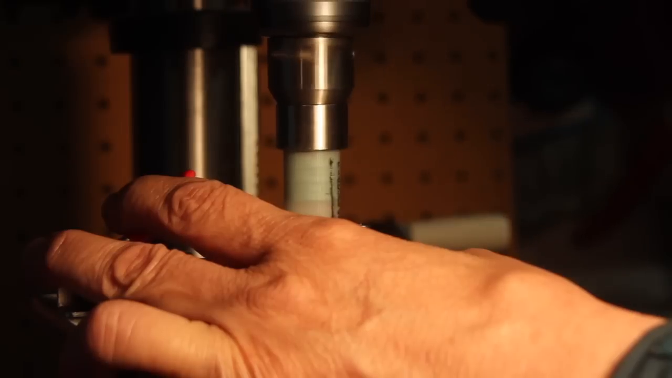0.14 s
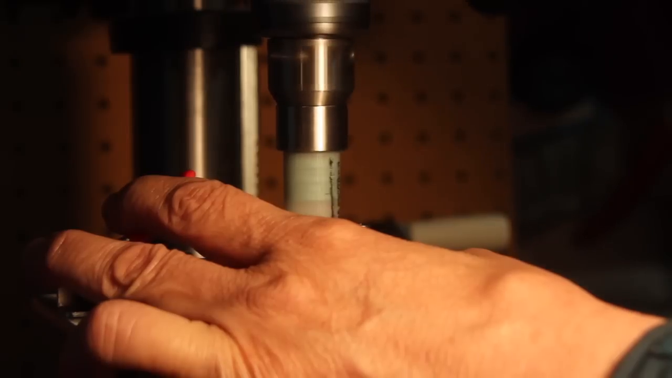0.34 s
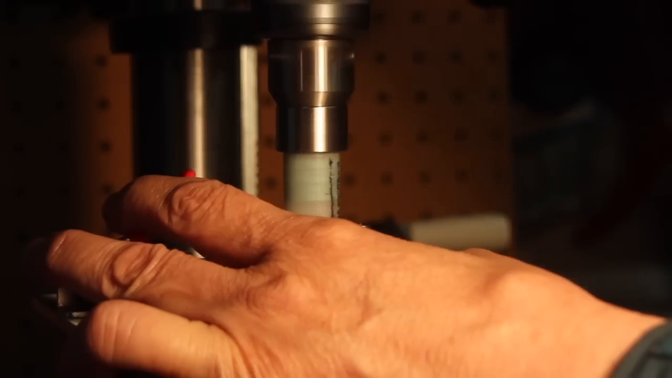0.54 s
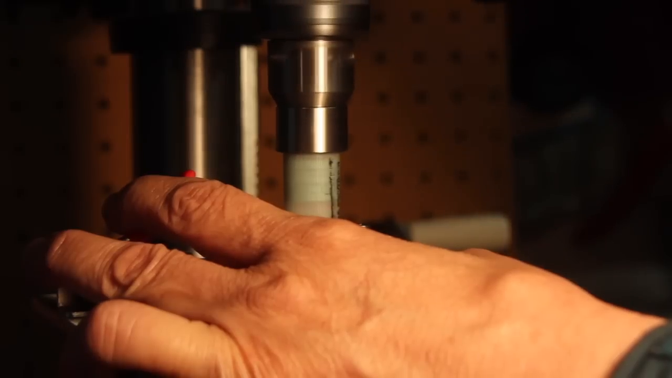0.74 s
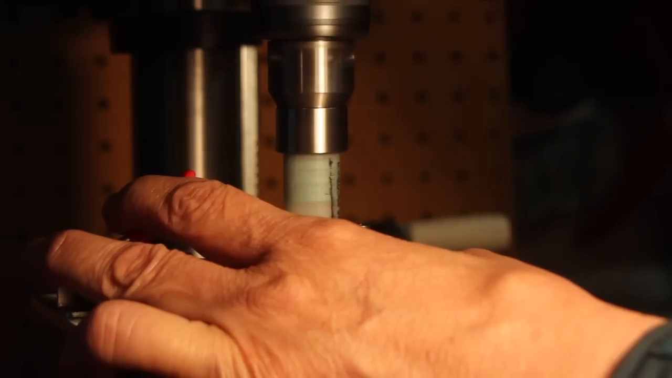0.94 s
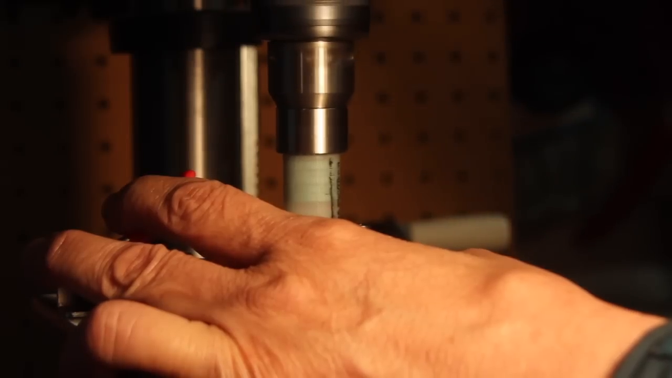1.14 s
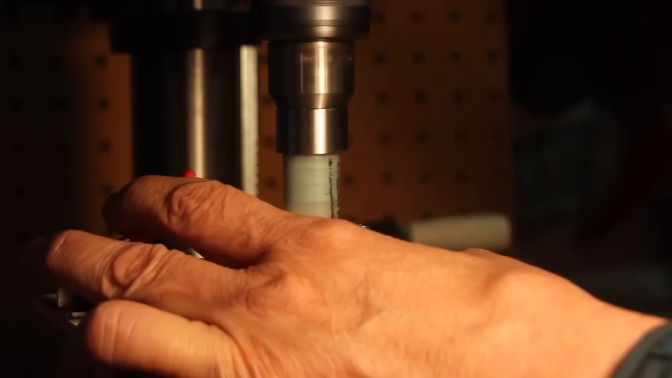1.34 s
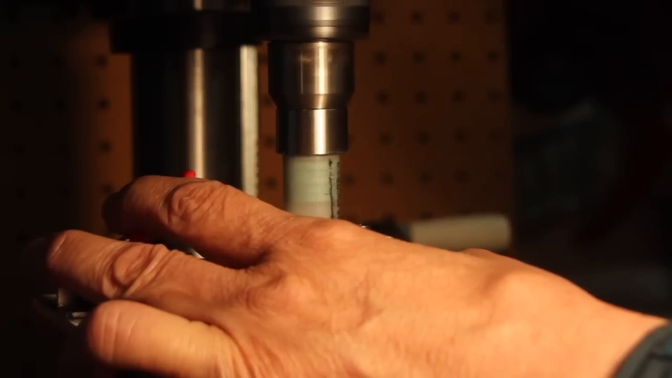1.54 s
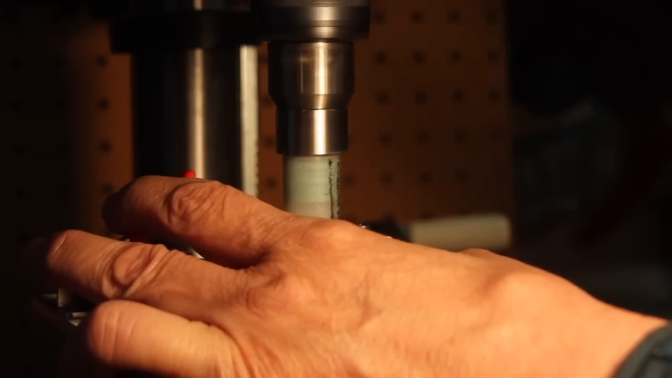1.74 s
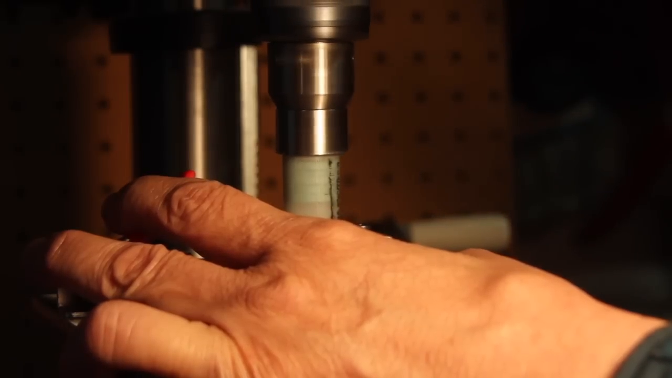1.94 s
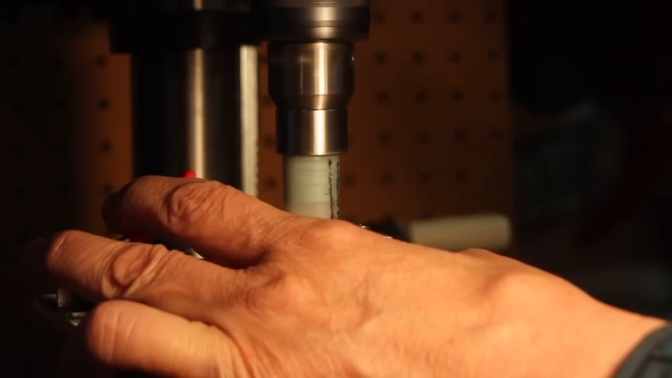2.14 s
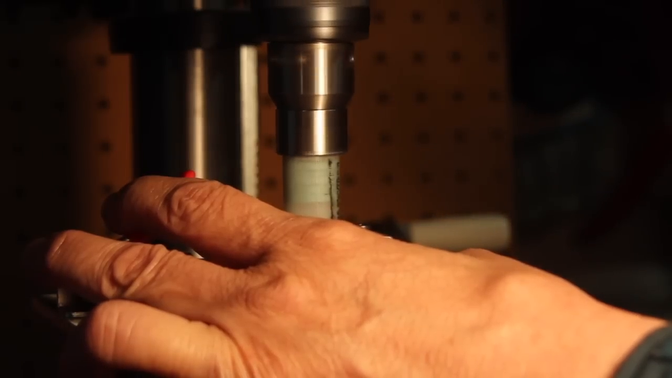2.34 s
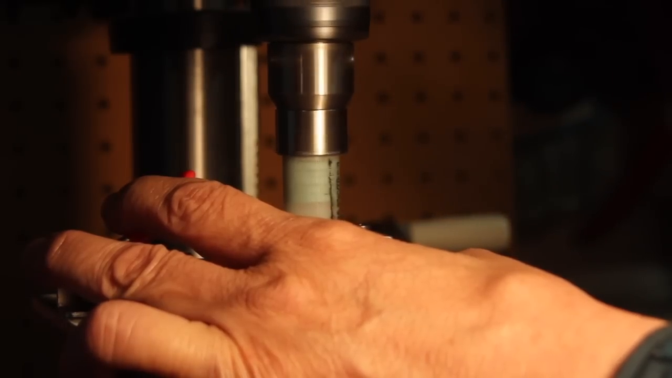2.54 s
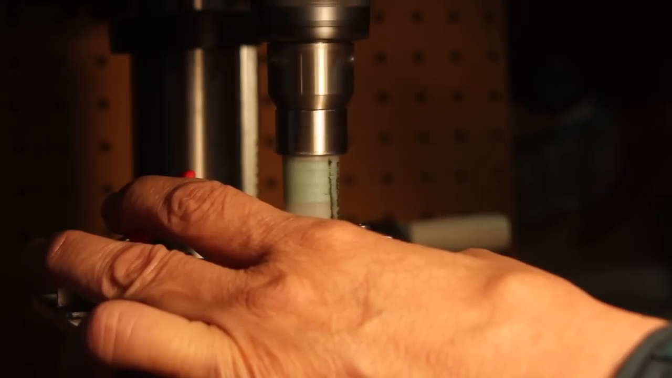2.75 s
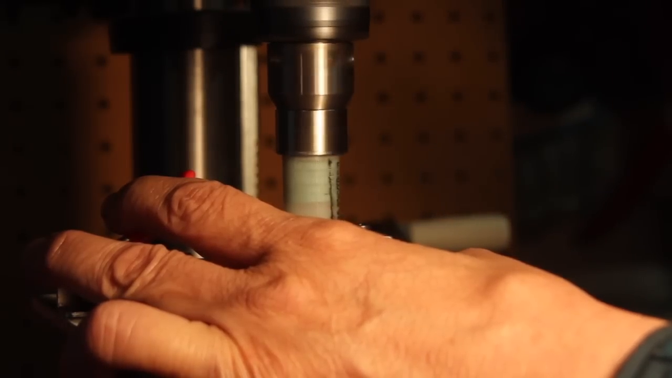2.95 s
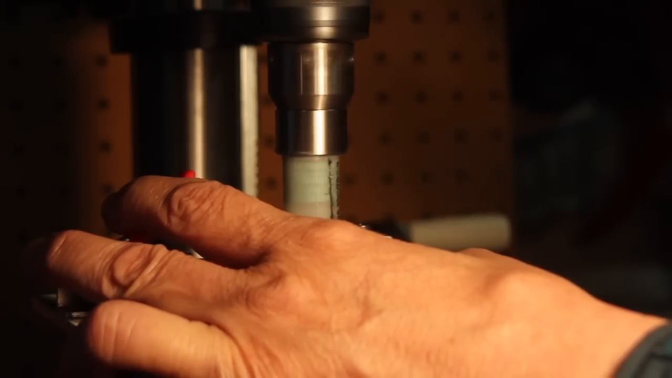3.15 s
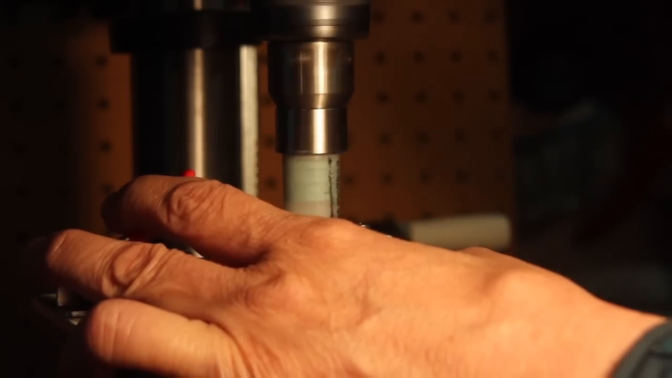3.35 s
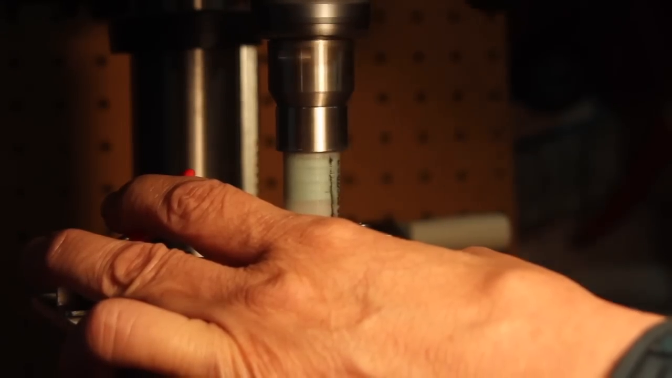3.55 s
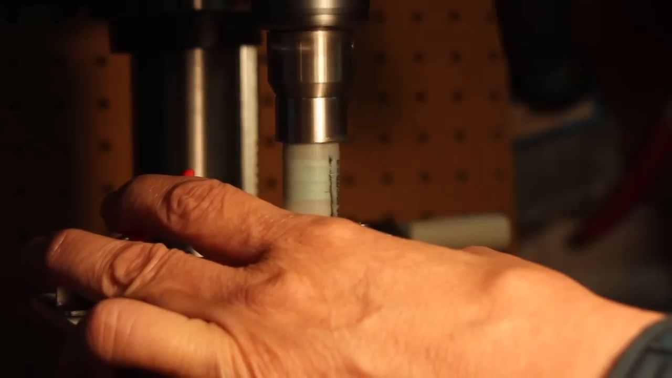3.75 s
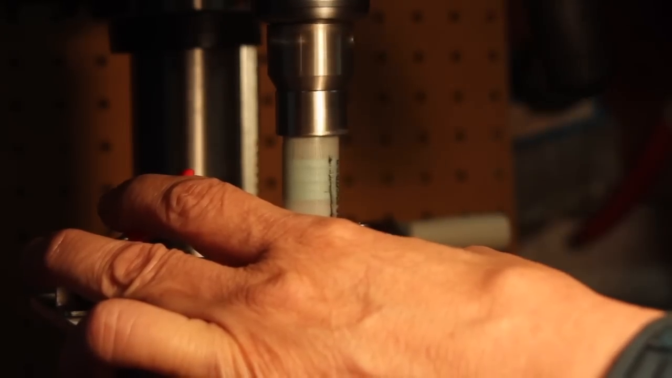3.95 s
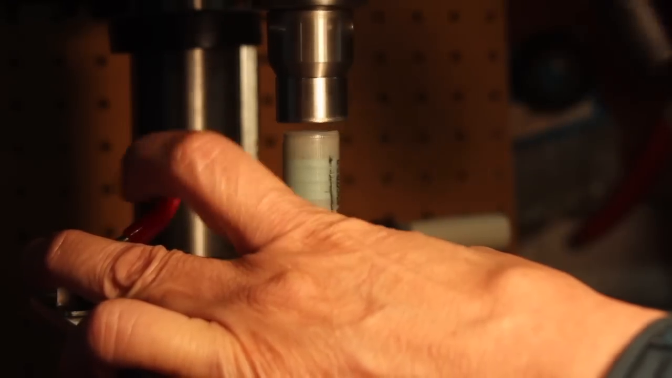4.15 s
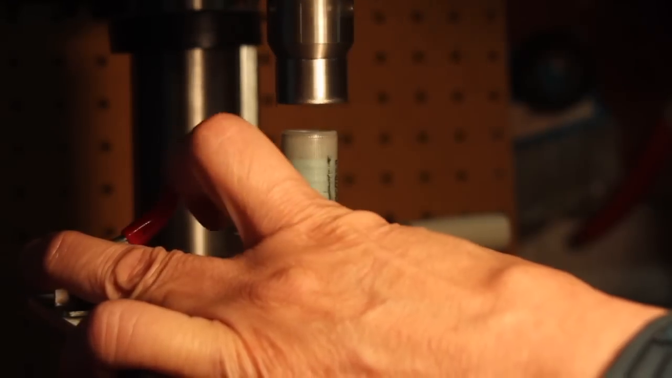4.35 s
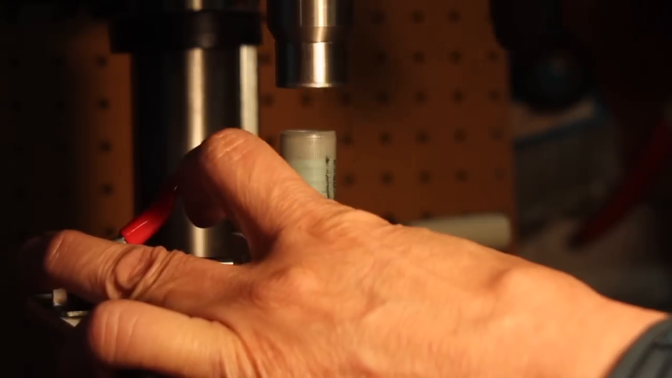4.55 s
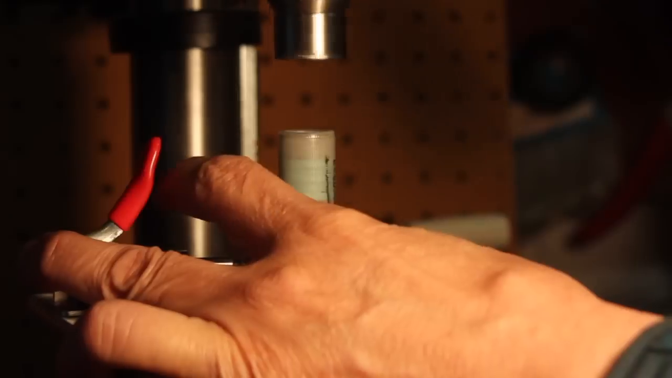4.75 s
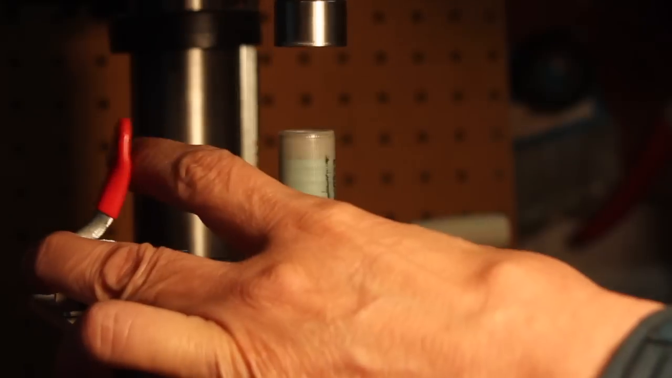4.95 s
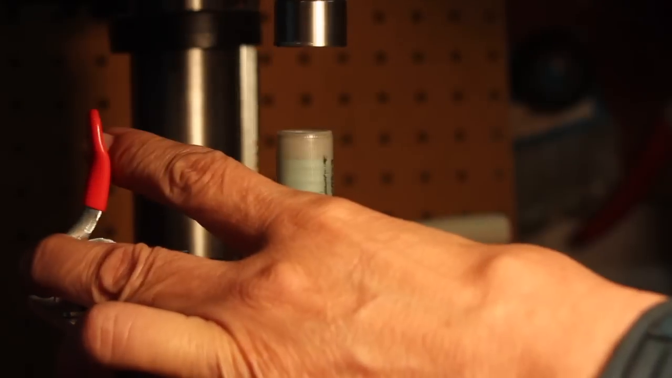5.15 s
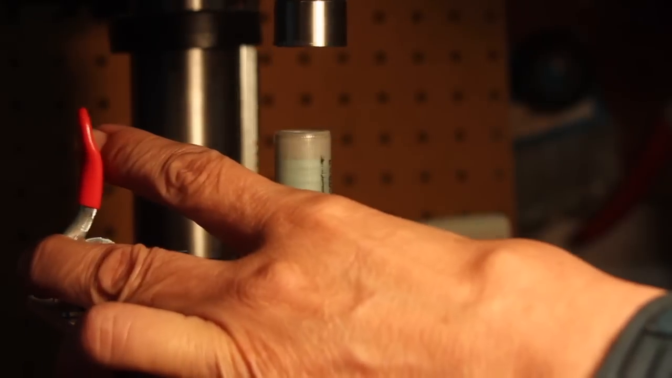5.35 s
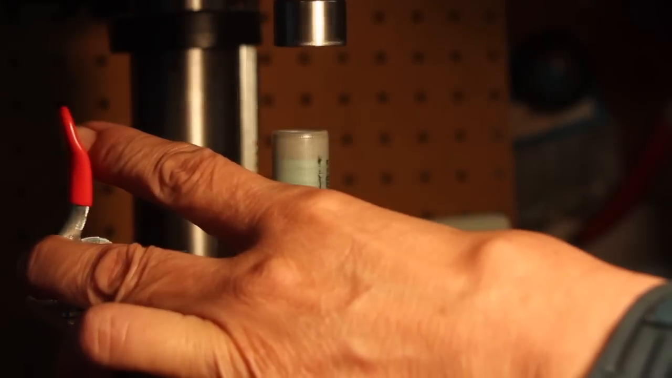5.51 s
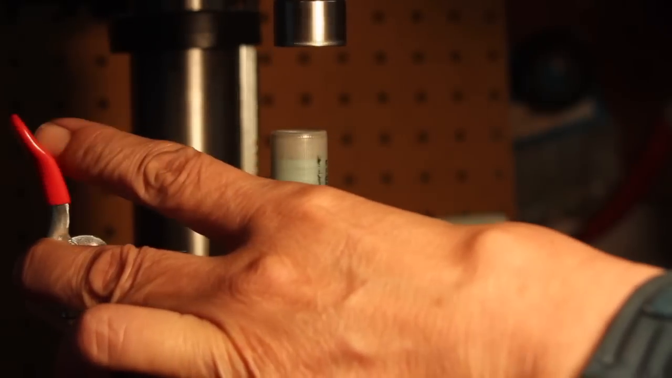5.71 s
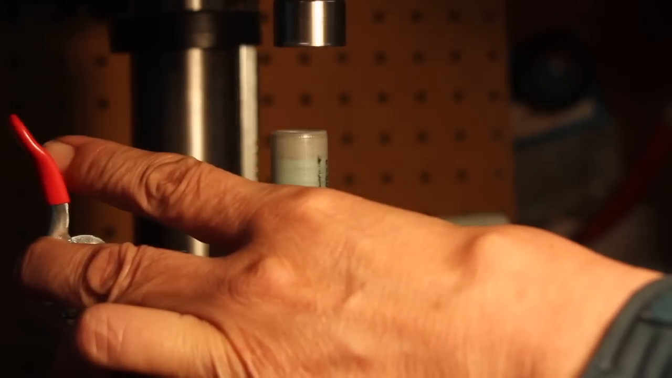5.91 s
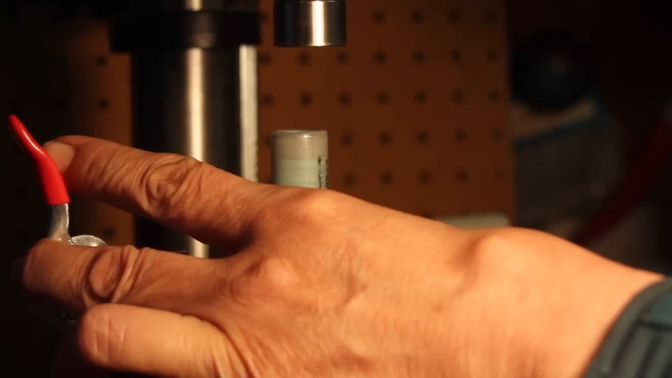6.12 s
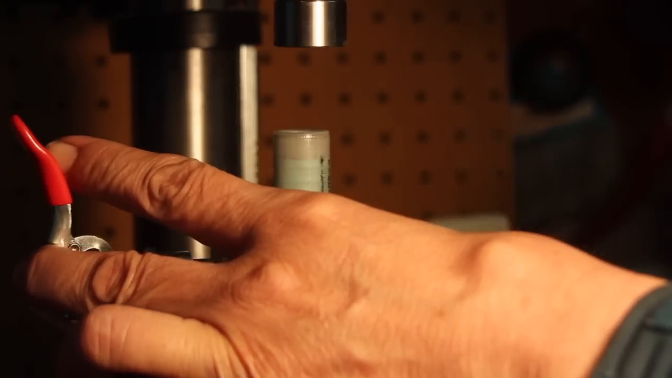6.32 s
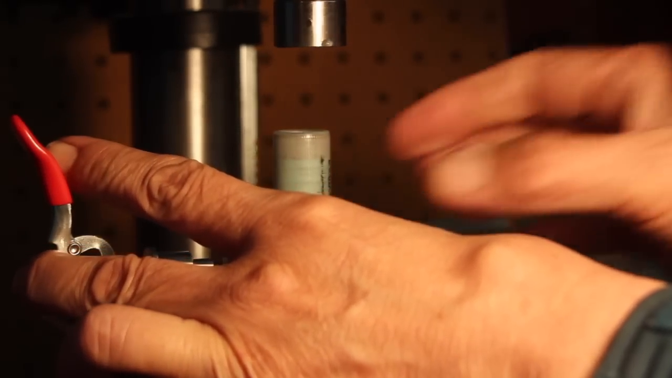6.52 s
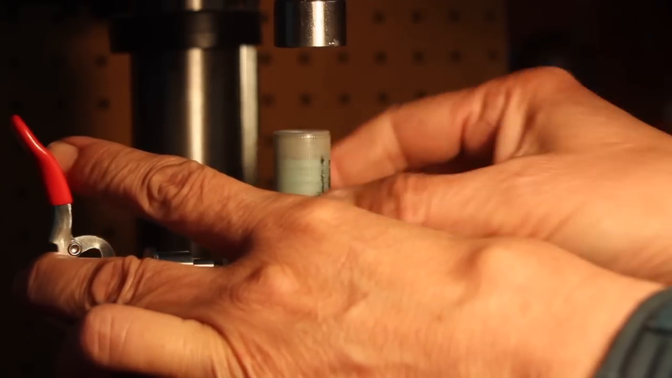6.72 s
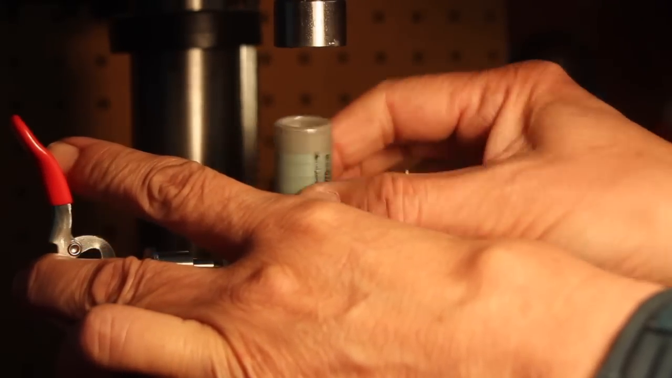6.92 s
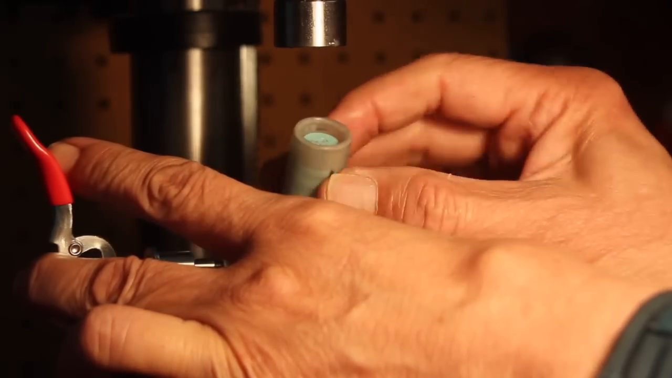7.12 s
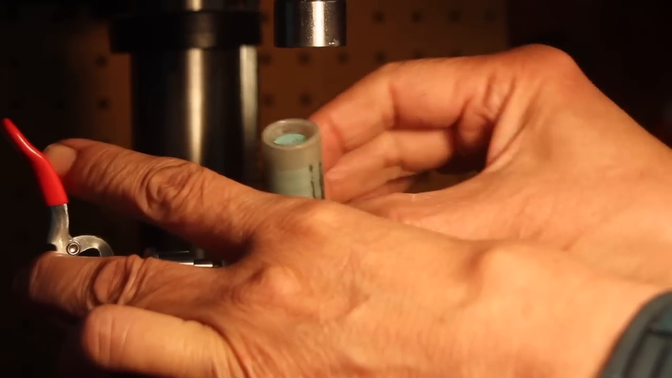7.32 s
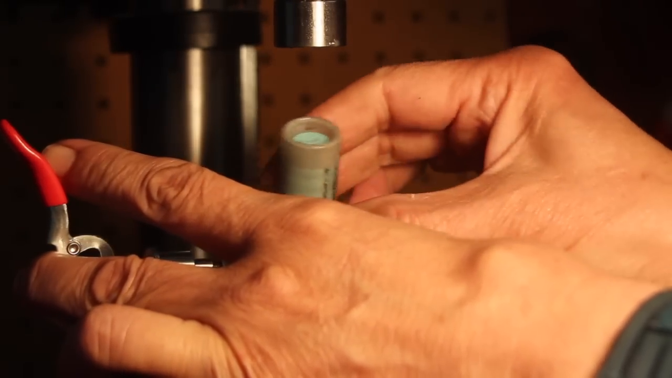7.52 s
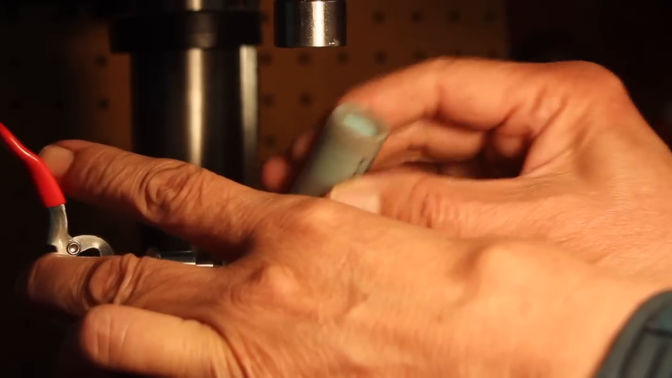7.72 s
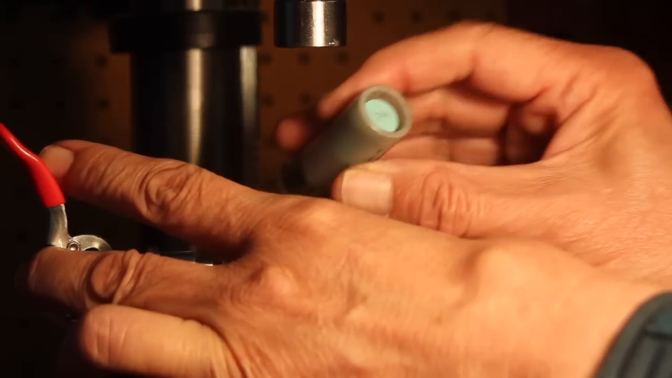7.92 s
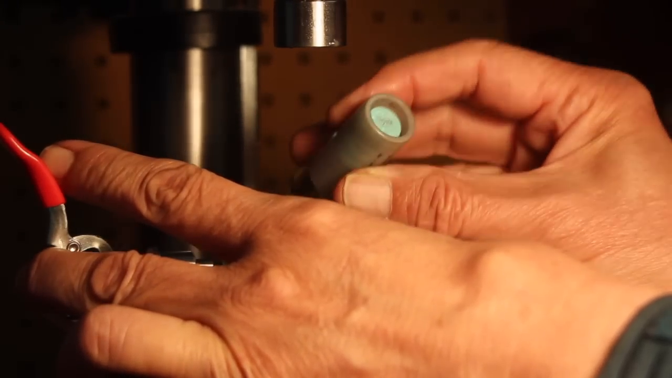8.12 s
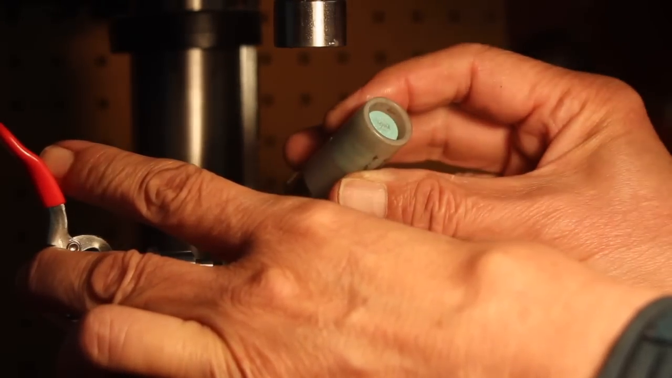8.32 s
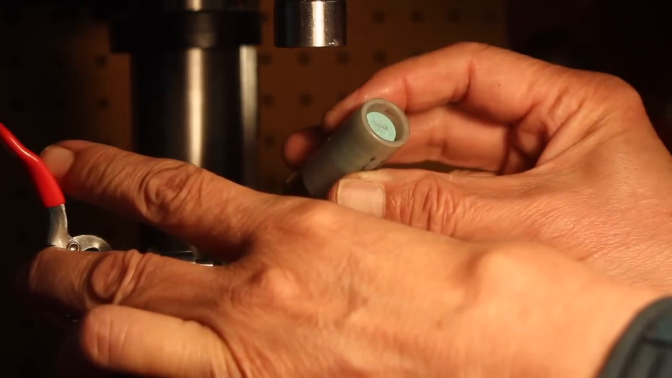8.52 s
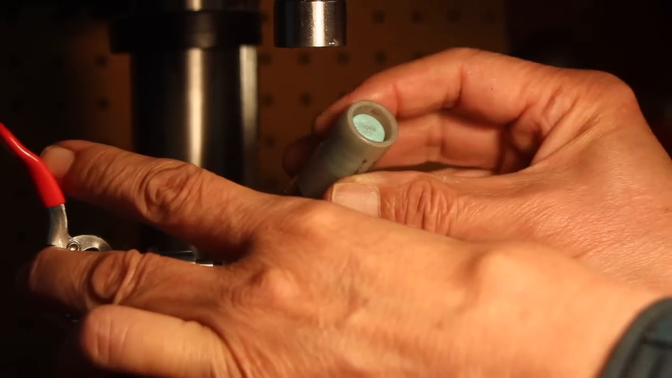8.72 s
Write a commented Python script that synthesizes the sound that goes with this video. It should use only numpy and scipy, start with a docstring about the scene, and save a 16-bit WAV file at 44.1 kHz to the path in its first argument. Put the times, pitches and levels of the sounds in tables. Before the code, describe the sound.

In a small workshop, close mono microphone: a drill press drones with a steady mains-like hum, rumble and metallic rattle while pressing a crimper onto a plastic shell. The grinding roughens, then eases as the tool lifts. A clamp clicks, the switch snaps off, and the machine coasts down in under a second with scrapes and a dull thump. Quiet room air follows, with small clicks as the shell comes free.

```python
"""Drill press crimping a shotshell

A bench drill press spins a roll crimper against a shotshell, close by in a small workshop.
Hum at multiples of twice the mains rate (sines) joins the rumble, rattle and buzz of loose parts (filtered noise).
The load lifts and a clamp clicks open; the switch snaps off and the machine coasts, with a thump before it stops.
The motor's starting switch scrapes, and the shell clicks out of its clamp (noise bursts through resonances)."""
import sys
import numpy as np
from scipy import signal
from scipy.fft import rfft, irfft
from scipy.io import wavfile

SR = 44100
rng = np.random.default_rng(int(sys.argv[2]) if len(sys.argv) > 2 else 0)


def master_out(mix):
    """Clip the mix to full scale and print it as 16-bit PCM to the path in sys.argv[1]."""
    frames = np.transpose(np.atleast_2d(mix))
    ceiling = np.clip(frames, -1, 1)
    pcm = np.round(ceiling * 32767).astype(np.int16)
    wavfile.write(sys.argv[1], SR, pcm)


N = 386757

MAINS_HZ, SPINDLE_HZ, BELT_HZ = 60, 10.14, 12.1
OFF_S = 5.814  # the current is cut
# noise spectrum of the belt rumble: frequency_hz, relative_density_db
RUMBLE = [(30, -47), (85, -21), (135, -11.5), (190, -8.5), (235, -3.5), (330, -1.5), (410, -0.5), (500, 0),
          (610, -6), (660, -7.5), (850, -12.5), (1150, -21), (1600, -48)]
# noise spectrum of the housing rattle: frequency_hz, relative_density_db
RATTLE = [(600, -23), (900, -4.5), (1180, -5), (1300, -3.5), (1600, 0.5), (1900, -2), (2080, -5.5),
          (2300, -6), (2600, -8.5), (3000, -15.5), (4000, -20.5), (6000, -42)]
# resonances of cast frame and belt cover: frequency_hz, width_hz, relative_level_db
FRAME = [(224.4, 21, -3), (262.6, 21, 5), (311, 23, -0.5), (345, 21, -1), (403, 34, -0.5), (480.6, 31, 1.5),
         (531, 31, -1), (583, 32, -6.5), (930, 240, -18.5)]


def amp(db):
    """Logarithmic level: 20 dB are a factor of ten in amplitude."""
    return 10 ** (np.asarray(db) / 20)


def unit(x):
    """Normalisation to an effective (rms) value of 1."""
    return x / np.sqrt(np.mean(x ** 2) + 1e-20)


def clock():
    """Uniform sampling: the time of every sample in seconds."""
    return np.arange(N) / SR


def in_time(rows):
    """Linear interpolation between breakpoints, one curve per column after the time."""
    s, *columns = np.transpose(rows)
    return [np.interp(clock(), s, c) for c in columns]


def between(load, loaded, free):
    """Linear mixing of the value under full load and the value running free."""
    return load * loaded + (1 - load) * free


def drift(rate_hz):
    """Low-passed random fluctuation of rms 1, from noise through a double real pole."""
    step = 40  # samples between computed points
    pole = np.exp(-80 * np.pi * rate_hz / SR)
    noise = rng.standard_normal(N // step + 2002)
    slow = signal.lfilter([1], [1, -2 * pole, pole * pole], noise)[2000:]  # settled part
    return np.interp(np.arange(N) / step, np.arange(len(slow)), unit(slow))


def tone(hz):
    """Phase as the integral of frequency: a sine of rms 1 with a random starting phase."""
    cycles = np.cumsum(hz * np.ones(N)) / SR + rng.random()
    return np.sqrt(2) * np.sin(2 * np.pi * cycles)


def colour(x, spectrum, size=4096):
    """Minimum-phase filtering of unit power, its causal response found by folding the cepstrum."""
    hz, db = np.transpose(spectrum)
    # the added 1 Hz keeps the logarithm finite
    level = np.interp(np.log(np.arange(size // 2 + 1) * SR / size + 1), np.log(hz), db)
    cepstrum = irfft(np.log(amp(level)))
    cepstrum[1:size // 2] *= 2
    cepstrum[size // 2 + 1:] = 0
    response = irfft(np.exp(rfft(cepstrum)))
    return signal.oaconvolve(x, response / np.linalg.norm(response))[:len(x)]


def resonate(x, modes, size=4096):
    """Modal superposition: parallel two-pole resonances, of unit power together."""
    response = np.zeros(size)
    for k, (hz, width, db) in enumerate(modes):
        r = np.exp(-np.pi * width / SR)
        poles = [1, -2 * r * np.cos(2 * np.pi * hz / SR), r * r]
        ring = signal.lfilter([1 - r * r, 0, r * r - 1], poles, signal.unit_impulse(size))
        response += (-1) ** k * amp(db) * ring
    return signal.oaconvolve(x, response / np.linalg.norm(response))[:len(x)]


def low_pass(x, hz, order=2):
    """Butterworth attenuation of the treble above a cutoff."""
    sections = signal.butter(order, min(hz, SR / 2 - 1000), fs=SR, output="sos")
    return signal.sosfilt(sections, x + 1e-18)


def impulse(at):
    """Ideal impact: one sample holds the whole contact."""
    return signal.unit_impulse(N, int(np.clip(at * SR, 0, N - 1)))


def burst(at, t60):
    """Exponential decay of dense ringing: noise starts at once and loses 60 dB in t60 seconds."""
    age = clock() - at
    return rng.standard_normal(N) * (age >= 0) * amp(-60 * np.clip(age / t60, 0, 4))


def hump(at, length):
    """Half-cosine envelope: a smooth rise to 1 and fall, centred on a moment."""
    return np.cos(np.pi * np.clip((clock() - at) / length, -.5, .5))


def swells(rows):
    """Addition of level changes in dB: the events' humps summed, one curve per level column."""
    return sum(np.outer(dbs, hump(s, length)) for s, length, *dbs in rows)


def workshop(x, wet_db, t60):
    """Diffuse reverberation: direct sound and a short decaying tail from bench and walls."""
    age = np.arange(SR // 2) / SR
    tail = low_pass(rng.standard_normal(len(age)) * amp(-60 * age / t60) * (age > .004), hz=9150)
    return x + amp(wet_db) * signal.oaconvolve(x, tail / np.linalg.norm(tail))[:N]


def running():
    """Forced vibration: the bite drains the hum and shakes the frame; all decays once the current is cut."""
    # pressure of the crimper on the shell: time_s, load (0-1)
    pressure_points = [(0, 0.99), (3.45, 1), (3.95, 0.05)]
    # bite of the crimper into the plastic rim: time_s, bite (0-1)
    bite_points = [(0, 0.1), (1.3, 0.22), (2.0, 0.77), (2.38, 0.93), (2.56, .55), (2.92, 0.73),
                   (3.12, 0.04), (4.2, 0)]
    # brief changes in the shaking: centre_s, length_s, frame_change_db, rattle_and_buzz_change_db
    surges = [(1.0, 0.077, 4, 0.5), (2.015, 0.065, 7, 3.5), (2.11, 0.041, 4, 5), (3.23, .26, -1, 1.5),
              (3.49, 0.061, 4, 4.5), (3.86, 0.31, -0.5, 3), (4.87, 0.21, 4, 2), (5.45, .08, 3.5, -0.5),
              (5.68, 0.12, 1, 2.5)]
    load, bite = np.clip(in_time(pressure_points)[0], 0, 1), in_time(bite_points)[0]
    frame_surge_db, surge_db = swells(surges)
    # running free, the frame swells and sinks slowly: 2.18 Hz, with a peak at 4.11 s
    idle_db = 2.0 * (1 - load) * np.cos(2 * np.pi * 2.18 * (clock() - 4.11))

    # drive levels, which each part then shares out among its layers
    strongest_db = between(load, loaded=-18.5, free=-17.5) - 5.5 * bite + 1.03 * drift(3.1)
    shake_db = between(load, loaded=-30.6, free=-29) + 6.5 * bite + frame_surge_db + idle_db
    rattle_db = between(load, loaded=-24.5, free=-26) - 1.54 * bite + surge_db
    buzz_db = between(load, loaded=-37.6, free=-37.7) - 2 * bite + surge_db
    throb_db = throbbing(load)

    body = rumbling(shake_db, load, throb_db)
    body = body + rattling(rattle_db, load, throb_db)
    body = body + buzzing(buzz_db, load, throb_db)
    body = low_pass(body, hz=14000, order=4)
    power = amp(-420 * np.maximum(clock() - OFF_S, 0))  # falls by 420 dB per second
    return power * (motor(strongest_db, load, bite) + body)


def motor(strongest_db, load, bite, waver=0.12, beat=0.17):
    """Magnetic attraction twice per mains cycle makes harmonic hum; rotor tones sag as load makes it slip."""
    # magnetic hum: multiple of twice the mains rate, loaded_relative_db, free_relative_db
    partials = [(1, -9.5, -11), (2, -5.5, -8.5), (3, 1.5, 0.5), (4, -6.5, -3), (5, -9, -6.5),
                (6, -18.5, -17.5), (7, -22.5, -23), (8, -25, -23.5), (10, -22, -37)]
    # rotor tones: free_speed_pitch_hz, level_db, wander_hz
    rotor_tones = [(162.9, -43.5, 0.44), (451.8, -30, 2.62), (774.4, -36, 0.31), (1142, -46.5, 0.82),
                   (616.3, -33.5, 3.59)]
    hum = 0
    for k, loaded_db, free_db in partials:
        # the strongest partial gives way most to the bite; the others sag a little and wander singly
        if k == 3:
            level = amp(strongest_db)
        else:
            level = amp(-19.5 - 2.5 * bite) * (1 + waver * min(k, 2) * drift(4.5))
        pitch_hz = 2 * MAINS_HZ * k
        # wandering side tones make all but the first partial beat under load
        side = beat * load * min(k - 1, 1) * tone(pitch_hz + SPINDLE_HZ * drift(2.014))
        hum = hum + level * amp(between(load, loaded_db, free_db)) * (tone(pitch_hz) + side)
    speed = 1 - .006 * load
    whine = sum(amp(db) * tone(hz * speed + wander * drift(9.1)) for hz, db, wander in rotor_tones)
    return amp(-.5) * hum + whine


def throbbing(load):
    """Periodic modulation in dB: spindle and belt press loose parts once a turn, harder under load."""
    t = clock()
    spindle = 2.0 * np.cos(2 * np.pi * SPINDLE_HZ * (t - .014))
    belt = 1.3 * np.cos(2 * np.pi * BELT_HZ * (t - .033))
    return (0.078 + 0.83 * load) * (spindle + belt) + 1.2 * drift(24)


def chatter(sharpness, uneven_db):
    """Intermittent contact: loose steel touches once per magnetic pull, each time with its own strength."""
    pulls = 2 * MAINS_HZ * clock()
    strengths = amp(uneven_db * rng.standard_normal(int(pulls[-1]) + 1))
    decay = np.exp(-sharpness * (pulls % 1))
    return unit(rng.standard_normal(N) * strengths[pulls.astype(int)] * decay)


def rumbling(shake_db, load, throb_db):
    """Stick-slip friction of plastic in the crimper shakes the frame in lumps; the belt rumbles more evenly."""
    # the belt follows the frame's level changes only in part
    belt_db = -22.5 + 0.36 * (shake_db + 29.5) + 0.77 * throb_db
    belt = amp(belt_db) * colour(chatter(sharpness=0.71, uneven_db=1.5), RUMBLE)
    slips = rng.standard_normal(N) * amp(2.04 * load * drift(30))
    return belt + amp(shake_db + 2.5 + 0.27 * throb_db) * resonate(slips, FRAME)


def rattling(rattle_db, load, throb_db):
    """Contact noise excites housing modes; the crimper modulates it six times a spindle turn."""
    # resonances of the sheet-metal housing: frequency_hz, width_hz, relative_level_db
    housing = [(1079, 25, -5), (1251, 37, -2), (1340, 33, -4.5), (1439, 14.5, 3.5), (1521, 52, 0.5),
               (1656, 37, -1), (1810, 39, 3), (1917, 53, -1), (2063, 65, -5.5), (2263, 33, -1),
               (2443, 29, -10), (2640, 46, -20)]
    ripple_db = 1.0 * load * np.cos(2 * np.pi * 6 * SPINDLE_HZ * clock())
    drive = amp(rattle_db + 0.72 * throb_db + ripple_db)
    dense = amp(-3.5) * colour(drive * chatter(sharpness=0.42, uneven_db=1.5), RATTLE)
    ringing = amp(-2.5) * resonate(drive * chatter(sharpness=1.43, uneven_db=2.0), housing)
    return dense + ringing


def buzzing(buzz_db, load, throb_db):
    """Pulsed contact makes steel buzz at the hum's rate; rolling friction in unloaded bearings adds a dry whirr."""
    # noise spectrum of loose steel: frequency_hz, relative_density_db
    fine_spectrum = [(2000, -11), (3400, 4), (4600, -0.5), (6000, 0.5), (7800, 1), (9300, 4), (10400, -6),
                     (11000, -9), (11500, -5), (12400, -8), (13300, -7), (14200, -17), (16000, -27)]
    # resonances of chuck, quill and column: frequency_hz, width_hz, relative_level_db
    steel = [(3430, 81, 6), (4170, 45, 5), (4566, 67, 5.5), (5081, 58, 4), (5900, 120, -1), (6800, 140, -3),
             (7430, 100, -14), (8200, 150, -13), (9300, 260, -5.5), (9600, 220, -5.5), (10080, 370, 1),
             (10570, 180, 2), (11420, 220, 1), (12500, 130, -8), (12995, 250, -4)]
    # noise spectrum of the unloaded spindle bearings: frequency_hz, relative_density_db
    bearings = [(2000, -13), (2800, 4), (3500, -4.5), (4300, 0.5), (5500, -4), (6500, -9.5), (7600, -8),
                (9500, -17), (11000, -6.5), (12500, -10), (14500, -16), (16000, -30)]
    dense = amp(-3) * colour(chatter(sharpness=0.76, uneven_db=1.8), fine_spectrum)
    ringing = amp(-3.5) * resonate(chatter(sharpness=1.9, uneven_db=2.0), steel)
    buzz = amp(throb_db - 2.1 * (1 - load)) * (dense + ringing)
    whirr = (1 - load) * amp(-2.0 + 3.5 * drift(28)) * colour(rng.standard_normal(N), bearings)
    return amp(buzz_db) * (buzz + whirr)


def coasting():
    """Uniform deceleration: rumble weakens as a power of speed; a thump sounds shortly before the machine stops."""
    # the slowing machine shudders: centre_s, length_s, rumble_change_db, rattle_change_db
    shudders = [(5.935, .06, 3.5, 3), (6.075, .15, 6, 5), (6.255, .13, 10, -2), (6.33, .08, 1.5, 11),
                (6.5, 0.046, 3.5, 7)]
    # noise spectrum of the thump: frequency_hz, relative_density_db
    thump_spectrum = [(20, -40), (45, -20), (80, -4), (130, -1), (350, 1), (900, -9), (2000, -37),
                      (6000, -60)]
    speed = np.clip(1 - (clock() - OFF_S) / 0.81, 0, 1)  # at rest 0.81 s after switch-off
    # fades in over 0.032 s, and out over the last of the speed
    turning = np.clip((clock() - OFF_S) / 0.032, 0, 1) * np.clip(speed / .12, 0, 1)
    shudder_db, clatter_db = swells(shudders)
    # frame and belt share one drive
    rumble = amp(-27 + shudder_db) * speed ** 0.87
    frame = rumble * amp(-3.5) * resonate(rng.standard_normal(N), FRAME)
    belt = rumble * amp(-5.5) * colour(rng.standard_normal(N), RUMBLE)
    rattle = amp(-48 + clatter_db + 2.8 * drift(25)) * colour(rng.standard_normal(N), RATTLE)

    # a groan falls by 8.5 octaves per second through 246 Hz at its middle
    groan_s = 6.083
    groan_hz = 246 * 2 ** np.clip(8.5 * (groan_s - clock()), -1, 1)
    groan = amp(-28) * hump(groan_s, length=.1) * tone(groan_hz)
    thump = amp(-2) * colour(impulse(6.426), thump_spectrum)
    return turning * (frame + belt + rattle + groan) + workshop(thump, wet_db=-13, t60=0.085)


def switches():
    """Impact and dry friction: the power switch snaps, then the starting switch rubs on its ringing plate."""
    # noise spectrum of the power switch: frequency_hz, relative_density_db
    snap_spectrum = [(400, -8), (800, -10), (1250, -17), (1700, 1), (2600, 7.5), (3300, -10), (4000, -1),
                     (5500, -11), (8000, -16), (11600, -10), (15800, -28)]
    # rubs and ticks as the rotor slows: start_s, level_db (before the plate), length_s, cutoff_hz
    scrapes = [(5.978, -33, 0.0065, 5000), (6.035, -34, .01, 3000), (6.135, -35, .014, 2500),
               (6.203, -10, 0.03, 15000), (6.264, -21, .01, 4000), (6.276, -21, 0.01, 6000),
               (6.313, -21, 0.0089, 6000), (6.324, -28, 0.01, 3000), (6.369, -21, 0.011, 4000),
               (6.393, -22, .018, 6000), (6.4555, -22.5, 0.0035, 4200), (6.49, -39, .015, 2200)]
    # resonances of the starting switch's plate: frequency_hz, width_hz, relative_level_db
    plate = [(1525, 72, -1), (1760, 40, 0.5), (1900, 50, -6), (2060, 35.4, 8), (2290, 88, -6),
             (2450, 100, 5), (2680, 73, -18), (4200, 100, -9), (4540, 81, -25), (7150, 60, -17),
             (10000, 44, -10)]
    # noise spectrum of the rubbing: frequency_hz, relative_density_db
    rub_spectrum = [(500, -47), (1000, -24), (1500, -0.5), (2100, -2), (2600, -2.5), (3200, -10.5),
                    (4200, -11.5), (5300, -16), (7000, -13.5), (10000, -18), (13000, -24), (15800, -33)]
    snap = amp(-10.5) * colour(burst(OFF_S, t60=0.03), snap_spectrum)
    friction, grain = np.zeros(N), rng.standard_normal(N)
    for start, db, length, cutoff_hz in scrapes:
        pressure = np.sin(np.pi * np.clip((clock() - start) / length, 0, 1))
        friction += amp(db) * low_pass(pressure * grain, cutoff_hz)
    rub = amp(-3.5) * resonate(friction, plate) + amp(-3) * colour(friction, rub_spectrum)
    return workshop(snap, wet_db=-17.5, t60=0.14) + workshop(rub, wet_db=-11.5, t60=0.27)


def clamp(ring_width_hz=280):
    """Impact excitation: lever and shell base knock on the steel holder, each spot with its own ring."""
    # clicks: start_s, level_db (before dulling), brightness_hz, t60_s, ring_pitch_hz, relative_ring_db
    clicks = [(4.748, -21, 10000, .05, 7660, -5), (7.091, -26, 10100, 0.053, 2860, -10),
              (7.262, -44.5, 1900, 0.12, 1590, -9), (7.677, -26, 13000, 0.058, 1650, -20),
              (7.757, -37.5, 3200, 0.1, 1450, -6), (7.824, -41, 2000, .15, 620, -6),
              (7.936, -35, 11000, 0.056, 3100, -3), (8.324, -46, 1700, .08, 1590, -9),
              (8.395, -47.5, 1700, .1, 1590, -9)]
    # noise spectrum of the knocks: frequency_hz, relative_density_db
    knock_spectrum = [(300, -28), (600, -16), (850, -6), (1200, -6), (1600, -1.5), (2200, -2), (3000, -3),
                      (3900, -8), (5000, -6), (6400, -5), (7300, -2.5), (7900, -3), (10500, -6.5),
                      (13000, -11), (16000, -21)]
    # resonances of the steel shell holder: frequency_hz, width_hz, relative_level_db
    holder = [(850, 22, -1), (1137, 31, -3), (1596, 39, 5), (1920, 50, -4), (2144, 42, 3), (2890, 83, -3),
              (7300, 91, 4)]
    blows, contacts, rings = np.zeros((3, N))
    for s, db, bright_hz, t60, ring_hz, ring_db in clicks:
        blow = amp(db) * dulled(burst(s, t60), bright_hz)
        blows += blow
        contacts += amp(db) * dulled(impulse(s), bright_hz)
        rings += amp(ring_db) * resonate(blow, [(ring_hz, ring_width_hz, 0)])
    knocks = amp(0.5) * colour(blows, knock_spectrum) + amp(16.5) * resonate(contacts, holder) + rings
    return workshop(knocks, wet_db=-10.5, t60=0.15)


def dulled(x, bright_hz):
    """Contact stiffness: a softer contact loses its treble and moves its energy downwards."""
    cutoff_hz = 1.2 * bright_hz
    return low_pass(low_pass(x, cutoff_hz), cutoff_hz) * (bright_hz / 12000) ** -.3


def background():
    """Stationary noise of room air, with a hiss that swells and sinks and a faint wavering tone."""
    # noise spectrum of the room air: frequency_hz, relative_density_db
    air_spectrum = [(15, -45), (25, -31), (76, -13.5), (152, -13), (222, -9.5), (371, -12.5), (474, -13),
                    (513, -14), (791, -17), (8970, -25), (15800, -25)]
    # noise spectrum of the hiss: frequency_hz, relative_density_db
    hiss_spectrum = [(40, -17.5), (130, -3), (280, 0), (700, -0.5), (2200, -5), (4500, -8), (7000, -12),
                     (10500, -10.5), (13000, -20), (16000, -36)]
    attack_s, hold_s, release_db_per_s = .44, .33, 54
    age = clock() - 5.82  # the hiss begins as the machine slows
    release_db = -release_db_per_s * np.maximum(age - attack_s - hold_s, 0)
    swell = np.clip(age / attack_s, 0, 1) ** 2 * amp(release_db)
    air = amp(-51 - 0.8) * colour(rng.standard_normal(N), air_spectrum)
    hiss = amp(-41.5) * swell * colour(rng.standard_normal(N), hiss_spectrum)
    return air + hiss + amp(-60) * tone(480 + 1.13 * drift(5.3))


def scene():
    """Linear superposition of all sources in one channel."""
    return (running() + coasting() + switches() + clamp() + background())[None]


def record(dry):
    """Band limitation: an elliptic low-pass cuts steeply above 15750 Hz."""
    return signal.sosfilt(signal.ellip(10, .1, 80, 15750, fs=SR, output="sos"), dry)


dry = scene()
out = record(dry)
master_out(out)
```